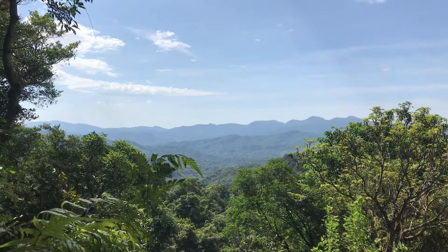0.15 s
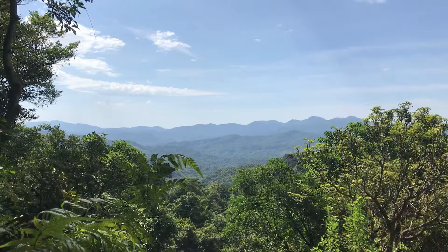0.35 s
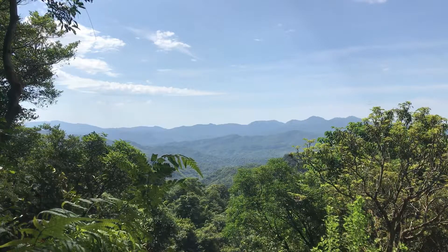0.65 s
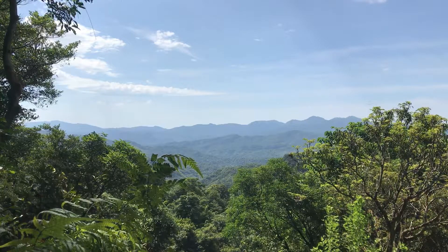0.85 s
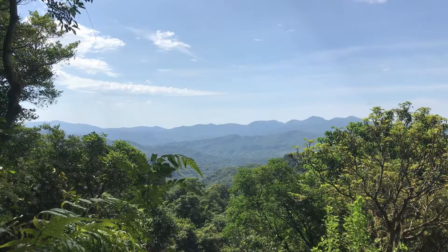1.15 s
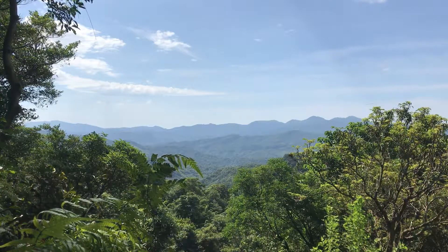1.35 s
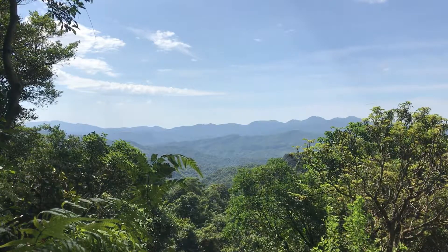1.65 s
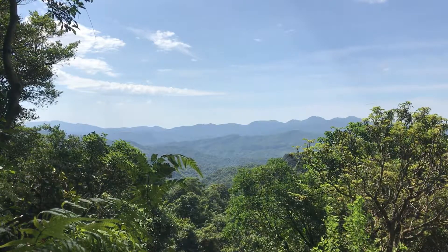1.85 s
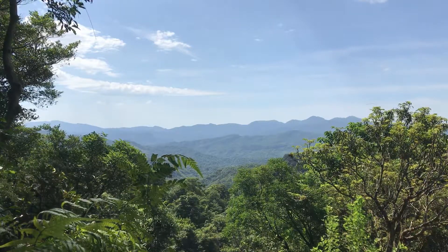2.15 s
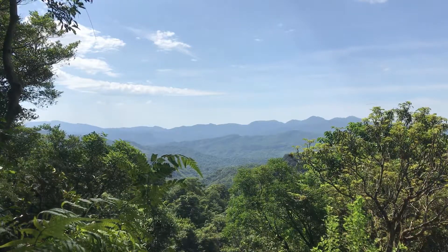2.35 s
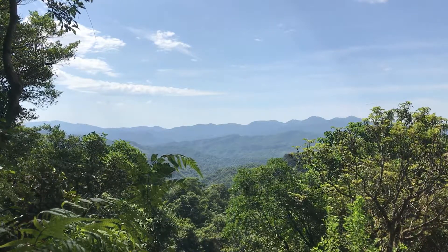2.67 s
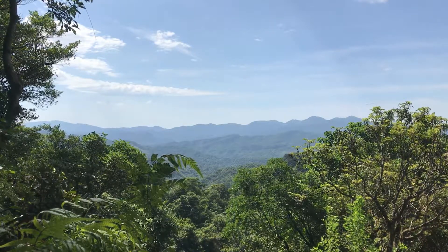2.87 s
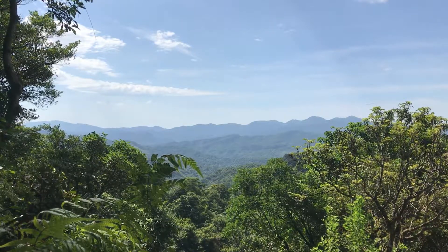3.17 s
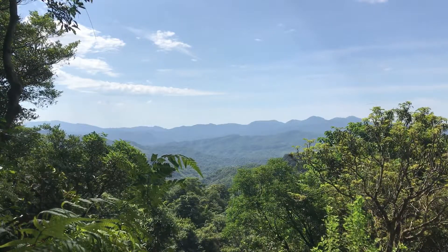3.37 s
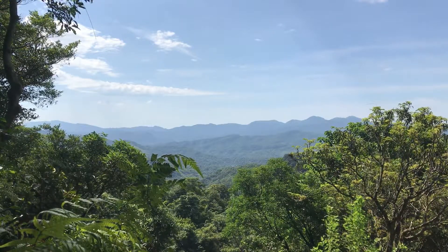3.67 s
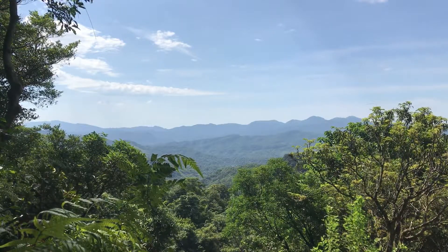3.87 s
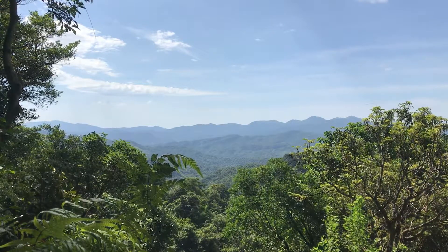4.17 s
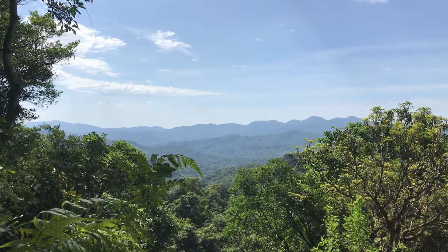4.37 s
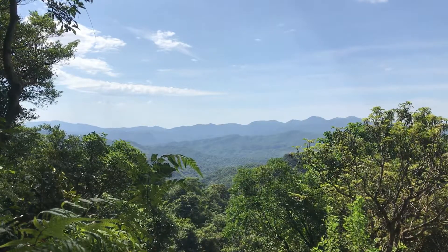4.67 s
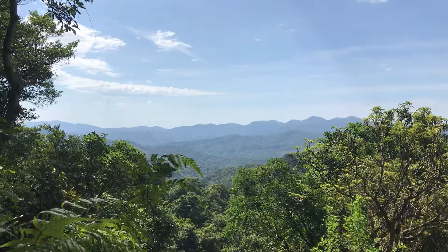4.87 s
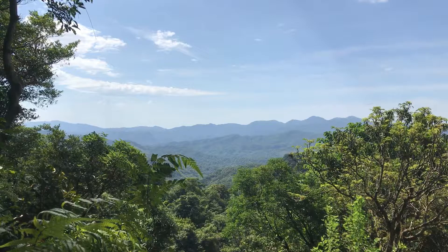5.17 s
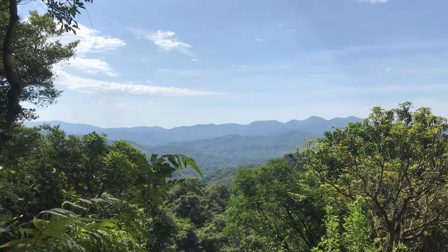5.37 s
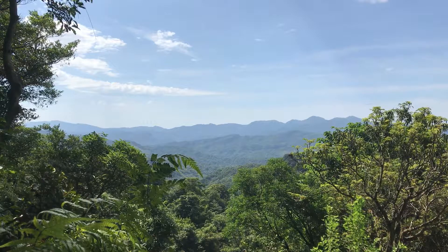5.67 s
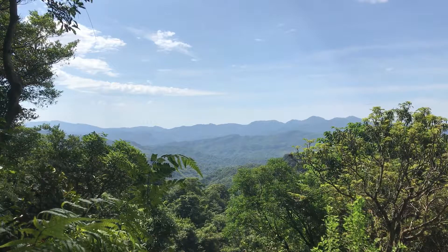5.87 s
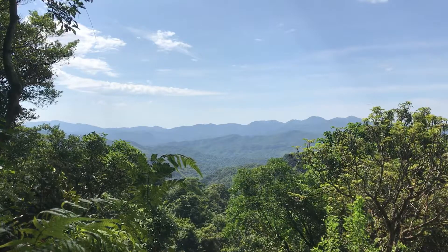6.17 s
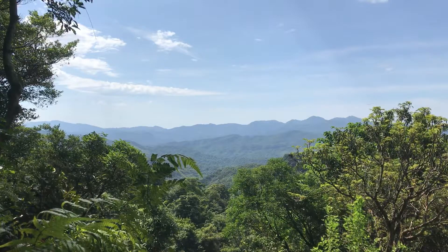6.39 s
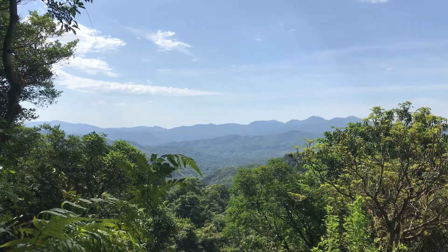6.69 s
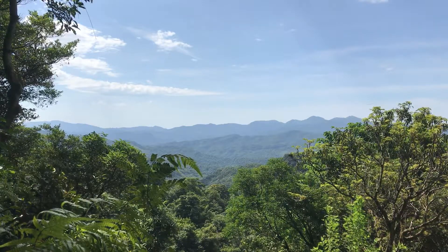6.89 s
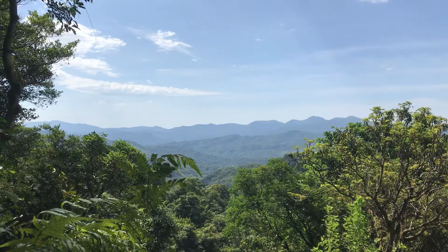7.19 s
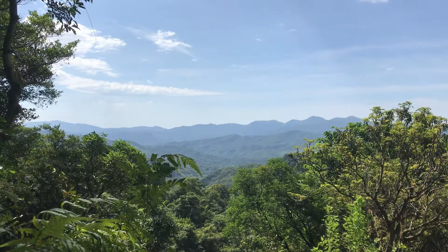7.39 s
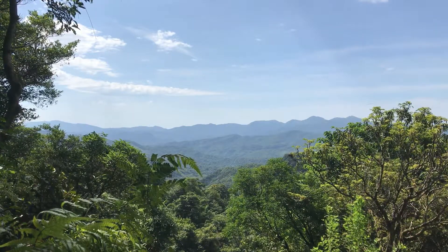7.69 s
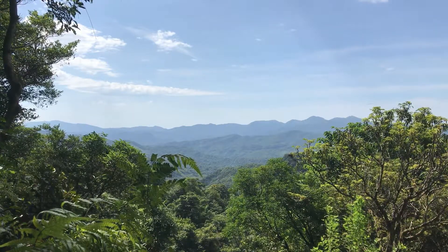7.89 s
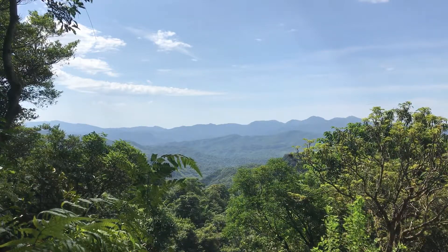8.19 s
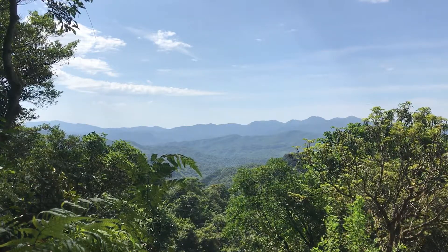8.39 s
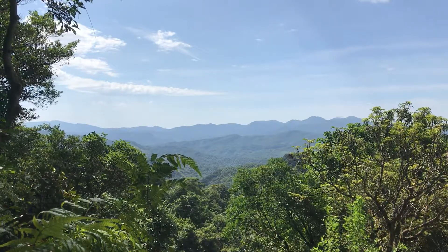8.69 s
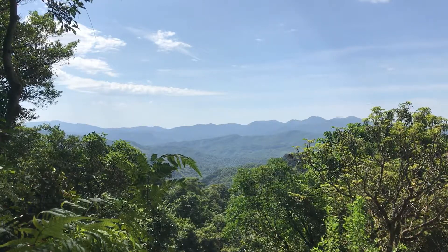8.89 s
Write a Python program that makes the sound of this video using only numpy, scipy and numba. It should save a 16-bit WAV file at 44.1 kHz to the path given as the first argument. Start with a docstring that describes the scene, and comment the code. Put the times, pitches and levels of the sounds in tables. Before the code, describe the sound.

Soft owl-like hoots in slow phrases and quick runs, with occasional bird whistles and raspy chatters, amid dense high-pitched cicada buzzing outdoors.

```python
"""A forested hilltop over a valley: quiet air, a far insect chorus, a cicada that drones and one that sizzles.
Close by, a cicada buzzes, stops within a second, stutters, then resumes a long falling buzz near the end.
Its clicks ring its abdomen. From half a second on, an owl-like bird pipes short falling hoots, slow phrases
alternating with quick runs; far birds answer. Another bird whistles, and twice chatters into a rasp.
The insects are clicks and noise through resonances, the birds gliding sines; echoes are decaying noise."""
import sys
import numpy as np
from scipy import signal
from scipy.fft import rfft, irfft
from scipy.io import wavfile
from scipy.ndimage import uniform_filter1d
from numba import njit

SR = 44100
rng = np.random.default_rng(int(sys.argv[2]) if len(sys.argv) > 2 else 0)


def generate_wav(sig):
    """Save sig (samples, or channels by samples) to the path in sys.argv[1] as 16-bit PCM at SR."""
    pcm = np.round(np.clip(np.atleast_2d(sig).T, -1, 1) * 32767).astype(np.int16)
    wavfile.write(sys.argv[1], SR, pcm)


N = 398663
T = np.arange(N) / SR  # s
BUZZ_RESUMES_S = 7.686  # the near cicada's closing buzz


def undb(db):
    """Decibels to gain."""
    return 10 ** (np.asarray(db) / 20)


def unit(x):
    """Scale to rms 1."""
    return x / np.sqrt(np.mean(x ** 2))


def curves(rows):
    """Each column of a table, joined by straight lines in time."""
    s, *columns = np.transpose(rows)
    return [np.interp(T, s, c) for c in columns]


def walk(rate, size=N):
    """Smooth chance with a spread near 1, drawn anew `rate` times per second."""
    k = max(int(SR / rate), 1)
    steps = np.repeat(rng.standard_normal(size // k + 1), k)
    return 1.3 * uniform_filter1d(steps, k)[:size]


def noise(colour):
    """Noise with a spectrum of (Hz, dB) points, falling steeply below the first."""
    hz, db = np.transpose(colour)
    f = np.arange(N // 2 + 1) * SR / N + 1
    gain = undb(np.interp(np.log(f), np.log(hz), db)) * np.minimum(f / hz[0], 1) ** 4
    return unit(irfft(rfft(rng.standard_normal(N)) * gain, N))


@njit
def svf(x, hz, width):
    """State-variable band-pass with a moving centre."""
    y, b, l = np.empty(len(x)), 0., 0.
    for i in range(len(x)):
        g, k = np.tan(np.pi * hz[i] / SR), width / hz[i]
        v = (b + g * (x[i] - l)) / (1 + g * (g + k))
        b, l, y[i] = 2 * v - b, l + 2 * g * v, k * v
    return y


def ring(x, hz, width):
    """A resonance (centre and width in Hz) applied twice, for steep skirts."""
    centre = np.minimum(hz + np.zeros(N), .45 * SR)
    once = svf(x, centre, float(width))
    return svf(once, centre, float(width))


def forest(x, wet_db, t60, patchy_db):
    """Direct sound plus scatter from trunks and leaves, dying by 60 dB in t60 s, in clumps where patchy."""
    t = T[:SR * 2]
    decay = np.exp(-np.log(1000) * t / t60)
    tail = rng.standard_normal(len(t)) * decay * undb(patchy_db * walk(70, size=len(t)))
    scatter = signal.fftconvolve(x, tail / np.linalg.norm(tail))[:N]
    return x + undb(wet_db) * scatter


def add(out, start, x):
    """Mix a short sound in at a time in seconds."""
    i = int(start * SR)
    lo, hi = max(i, 0), min(i + len(x), N)
    if hi > lo:
        out[lo:hi] += x[lo - i:hi - i]


def valley_air():
    """Distant air and valley rumble, steady noise whose level wanders slightly."""
    # Each row: frequency in Hz, relative level in dB.
    air_colour = [(22, -28), (45, -3), (63, 2), (110, -4.5), (250, -11), (600, -17.5), (3500, -20.5)]
    return noise(air_colour) * undb(-58.5 + .5 * walk(7.5))


def chorus():
    """Many far insects blur into a band; a few hold their own pitch; all sink towards the end."""
    # The blur. Each row: frequency in Hz, relative level in dB.
    blur_colour = [(3300, -55.5), (4200, -32), (5200, -30.5), (6000, -9.5), (6800, -1), (7500, 0.5),
                   (8500, -0.5), (9300, -8), (10400, -14), (15500, -29)]
    # Pitches that stand out. Each row: pitch in Hz, width in Hz, relative level in dB.
    voices = [(4630, 310, -20.5), (5190, 250, -16.5), (6626, 69, 5), (6786, 31, 3), (7136, 180, 7.5),
              (7360, 113, 5), (8330, 54, 4.5)]
    lines = 0
    for hz, width, db in voices:
        voice = unit(ring(rng.standard_normal(N), hz, width))
        lines = lines + undb(db + 2 * walk(1.156)) * voice
    fade_db = np.interp(T, [0, 7, 9], [0, -1, -4])
    band = undb(-30.5) * noise(blur_colour) + undb(-32.0) * unit(lines)
    return band * undb(fade_db + .5 * walk(13))


def hoot(hz, fall):
    """A brief, nearly pure falling note, peaking mid-way through 0.1 s, where it slides fastest (Hz per s)."""
    t = T[:SR // 10] - 1 / 20
    swell = np.exp(-(t / np.where(t < 0, .008, .014)) ** 2)
    slide = fall * .019 * np.tanh(t / .019)
    return swell * np.sqrt(2) * np.sin(2 * np.pi * np.cumsum(hz - slide) / SR)


def far_birds():
    """Other hooting birds answer from across the valley, half lost in their echoes."""
    # Peaks of the clearest hoots, in seconds.
    clear_hoots = [0.472, 0.786, 0.883, 1.161, 2.232, 4.553, 4.645, 5.469, 5.604, 6.321, 6.799, 7.748,
                   8.556]
    far_hz, far_db = 1170, -58.5
    faint_per_s, faint_hz, faint_db = 7, 1100, -65  # averages of the faint hoots scattered between
    far = np.zeros(N)
    for s in clear_hoots:
        add(far, s - 1 / 20, undb(far_db) * hoot(far_hz, fall=10000))
    for k, (late, pitch, loud) in enumerate(rng.standard_normal((100, 3))):
        start = (k + late / 2) / faint_per_s - 1 / 10
        faint = undb(faint_db + 2 * loud) * hoot(faint_hz * (1 + .05 * pitch), fall=10000)
        add(far, start, faint)
    return forest(far, wet_db=-3, t60=1.1, patchy_db=5)


def sizzling_cicada():
    """A very high hiss that slowly grows, easing off about every 1.2 s, most deeply towards the end."""
    # Each row: frequency in Hz, relative level in dB.
    hiss_colour = [(9500, -27), (10400, -11), (11000, 8.5), (11550, 5.5), (12800, 7.5), (14000, 2.5),
                   (15700, -2)]
    # Each row: middle of the pause in seconds, length in seconds, depth in dB.
    pauses = [(0, 0.64, 4.5), (1.372, .16, 5), (2.3, 0.33, 2), (3.502, 0.65, 2), (4.74, 0.42, 4),
              (5.906, 0.39, 6), (7.13, .48, 8.5), (8.366, 0.43, 10)]
    start_db, growth_db_per_s = -37, 0.4339
    eased_db = sum(depth * np.exp(-(2 * (T - s) / length) ** 4) for s, length, depth in pauses)
    tone = unit(ring(rng.standard_normal(N), 11555, width=110))
    hiss = noise(hiss_colour) + undb(-14) * tone
    return hiss * undb(start_db + growth_db_per_s * T - eased_db + .5 * walk(20))


def tymbal(rate, rasp, jitter, uneven, count=6):
    """Ribs buckle in turn, over and over; each has its own timing and strength and trails a crackle."""
    turns = np.cumsum(rate) / SR
    rib = turns.astype(int) % count
    early, strong = (unit(r - r.mean())[rib] for r in rng.standard_normal((2, count)))
    phase = (turns + jitter * walk(700) + uneven * early) % 1
    lag = (phase - .5) * SR / rate  # samples from the click
    clicks = np.sinc(lag) * np.exp(-(lag / 6) ** 2) * undb(walk(500) + strong)
    crackle = rng.standard_normal(N) * np.exp(-((phase - .5) % 1) / .3)
    sound = unit(clicks) + rasp * unit(crackle)
    # so small a body radiates little below its resonance
    return signal.sosfilt(signal.butter(8, 4850, "high", fs=SR, output="sos"), sound)


def droning_cicada():
    """An unbroken buzz that slows, quickens and slows again while its resonance falls."""
    # Each row: time in seconds, clicks per second, abdomen resonance in Hz, level in dB.
    drone = [(0, 510, 8200, -27.5), (2, 410, 8000, -27), (4, 520, 7740, -29.5), (6, 550, 7290, -31),
             (7.5, 522, 7120, -31), (9.04, 475, 6187, -32)]
    rate, hz, db = curves(drone)
    clicks = tymbal(rate, rasp=.45, jitter=.02, uneven=.025)
    body = ring(clicks, hz, width=1520)
    scattered = forest(body, wet_db=-6, t60=.2, patchy_db=0)
    return unit(scattered) * undb(db + .5 * walk(18))


def chirp(length, first_hz, last_hz, db, rasp, undertone=0):
    """A slurred note whose pitch is shaken by a rough syrinx; the undertone lies an octave below."""
    n = int(length * SR)
    shake = 1 + .115 * np.clip(rasp, 0, 1) * walk(1000, size=n)
    hz = np.linspace(first_hz, last_hz, n) * shake
    phase = 2 * np.pi * np.cumsum(hz) / SR
    tone = unit(np.sin(phase) + undertone * np.sin(phase / 2))
    return tone * signal.windows.tukey(n, .6) * undb(db - 1.8)


def chattering_bird():
    """Five harsh upslurs slow and swell into a long rasp; clear whistles crown it or sound alone."""
    # Starts of the chatters, in seconds.
    chatter_starts = [2.23, 5.942]
    # Single whistles, squeaks and rasps. Each row: start in seconds, length in seconds, first pitch in Hz,
    # last pitch in Hz, relative level in dB, rasp from 0 to 1.
    whistles = [(-.02, .065, 2606, 2670, -48.5, 0.26), (-.02, 0.077, 2120, 2055, -56.5, .7),
                (2.637, 0.024, 1725, 1500, -50, 0.06), (2.65, 0.118, 2300, 2414, -46, 0.23),
                (3.52, .13, 2104, 2030, -65, 0.62), (3.72, 0.073, 2460, 2420, -66, 0.18),
                (4.077, 0.019, 2100, 2500, -56, .6), (4.106, 0.16, 2260, 2274, -55, 0.21),
                (4.119, 0.053, 2835, 2920, -51.5, 0.82), (4.171, 0.126, 2490, 2667, -50, 0.12),
                (4.281, 0.029, 2740, 2900, -42.5, 0.02), (4.308, 0.0256, 2620, 2180, -46, 0.34),
                (6.516, 0.022, 1750, 1570, -46.5, 0.3), (6.583, 0.084, 2535, 2520, -44, .1),
                (6.626, 0.047, 1950, 2600, -47.5, 1), (8.768, 0.09, 1606, 1610, -61, 0.2),
                (8.868, 0.038, 2740, 2780, -60.5, 0.2), (8.983, .081, 1960, 2030, -61, 0.1)]
    first_gap_s, slowing, note_s = .072, 1.15, 0.0784  # each gap is longer by the slowing factor
    from_hz, to_hz, first_db, step_db = 1730, 2060, -52, 1
    rasp_after_s, rasp_s, rasp_hz, rasp_db = .42, .18, 1990, -46.5
    harsh, clear = np.zeros(N), np.zeros(N)
    for start in chatter_starts:
        s = start
        for k in range(5):
            add(harsh, s, chirp(note_s, from_hz, to_hz, first_db + k * step_db, rasp=.68))
            s += first_gap_s * slowing ** k
        add(harsh, start + rasp_after_s, chirp(rasp_s, rasp_hz, rasp_hz, rasp_db, rasp=1.0))
    for s, *note in whistles:
        add(clear, s, chirp(*note, undertone=undb(-17.5)))
    # the bird's own tree scatters it quickly, the wider forest faintly and for longer
    own_tree = forest(harsh + clear, wet_db=-3, t60=.33, patchy_db=1)
    return forest(own_tree, wet_db=-12, t60=1.2, patchy_db=1)


def hooting_bird():
    """Slow phrases of evenly spaced hoots, each with a soft first note, alternate with quick runs."""
    # Slow phrases. Each row: first peak in seconds, number of notes, relative level in dB.
    phrases = [(0.549, 2, -40), (2.295, 3, -40), (4.092, 4, -39.5), (5.931, 3, -40), (7.829, 3, -40)]
    # The quick run. Each row: peak in seconds into the run, relative level in dB, pitch in Hz,
    # fall in Hz per second.
    run = [(0, -38, 1060, 16100), (.066, -35.5, 1050, 14850), (.129, -37, 1030, 12040),
           (.19, -38.5, 1010, 8460), (.257, -43, 1000, 6040), (.361, -45.5, 995, 5000)]
    # Starts of the runs, in seconds.
    run_starts = [1.319, 3.171, 5.024, 6.874, 8.75]
    gap_s, slow_hz, slow_fall, first_note_db = .1025, 993, 11500, -3  # fall in Hz per s
    notes = []
    for start, count, db in phrases:
        for k in range(round(count)):
            notes.append((start + k * gap_s, db + first_note_db * (k == 0), slow_hz, slow_fall))
    for start in run_starts:
        notes += [(start + s, db, hz, fall) for s, db, hz, fall in run]
    near = np.zeros(N)
    # pitch and slide vary a little from note to note
    for (s, db, hz, fall), (pitch, slide) in zip(notes, rng.standard_normal((len(notes), 2))):
        note = undb(db - 3.3) * hoot(hz * (1 + .01 * pitch), fall * (1 + .1 * slide))
        add(near, s - 1 / 20, note)
        # the slope below throws each note back a moment later
        add(near, s - 1 / 20 + .011, undb(-10) * note)
    return forest(near, wet_db=-10.0, t60=2.0, patchy_db=2)


def syllable_gate():
    """Open while the near cicada sings: the opening buzz, each syllable of each bout, the closing buzz."""
    # Bouts, from long syllables through a flutter and pairs to steady ticks. Each row: start in seconds,
    # number of syllables, period in seconds, syllable length in seconds.
    bouts = [(0.907, 3, 0.083, 0.063), (1.157, 2, .09, .075), (1.33, 1, 0, .052), (1.42, 2, .068, 0.063),
             (1.617, 2, .139, 0.07), (1.905, 2, .086, 0.058), (2.078, 7, .054, 0.028),
             (2.483, 2, .077, .028), (2.674, 2, .049, .031), (2.845, 2, .058, 0.033),
             (3.06, 4, .163, 0.036), (3.732, 8, .1775, 0.038), (5.157, 5, .204, .036),
             (6.169, 8, .1862, 0.04), (7.602, 1, 0, 0.03)]
    buzz_stops_s = .848
    spans = [(0, buzz_stops_s), (BUZZ_RESUMES_S, T[-1])]
    for start, count, period, length in bouts:
        spans += [(start + k * period, length) for k in range(round(count))]
    gate = np.zeros(N)
    for s, length in spans:
        corners = [s - .006, s + .006, s + length - .008, s + length + .01]
        gate += np.interp(T, corners, [0, 1, 1, 0])
    return gate


def stuttering_cicada():
    """Clicks ring the abdomen, whose pitch sinks as it stretches; the closing buzz is more regular."""
    # Each row: time in seconds, mean clicks per second, abdomen resonance in Hz, relative level in dB.
    song = [(0, 480, 6630, -29.5), (1.2, 475, 6350, -30.5), (2.8, 480, 6320, -30), (3.6, 464, 6140, -31),
            (7.0, 556, 6060, -32), (7.9, 586, 6010, -33), (8.3, 616, 5580, -33), (8.7, 650, 5450, -32),
            (9.04, 662, 5310, -31)]
    pull_slowing = .11  # share of the click rate lost over each muscle pull of the closing buzz
    rate, hz, db = curves(song)
    closing = T > BUZZ_RESUMES_S
    pull = np.cumsum(rate) / SR / 10 % 1  # a pull lasts about ten clicks
    rate = rate * (1 + closing * pull_slowing * (.5 - pull))
    jitter = np.where(closing, .008, .024)
    uneven = np.where(closing, .004, .035)
    clicks = tymbal(rate, rasp=.2, jitter=jitter, uneven=uneven)
    # the membrane rings first, then the air sac behind it, so the skirts are steep
    membrane = ring(clicks, hz, width=1780)
    body = ring(membrane, hz, width=1860)
    sung = unit(body) * syllable_gate() * undb(db + .8 * walk(25))
    return forest(sung, wet_db=-14, t60=.15, patchy_db=0)


def scene():
    """All the voices over the quiet air of the valley, at one microphone."""
    background = valley_air() + chorus() + far_birds()
    cicadas = sizzling_cicada() + droning_cicada() + stuttering_cicada()
    birds = chattering_bird() + hooting_bird()
    return (background + cicadas + birds)[None]


def record(dry):
    """The recorder cuts the top, steeply above 15.7 kHz."""
    return signal.sosfilt(signal.ellip(10, .2, 80, 15700, fs=SR, output="sos"), dry)


dry = scene()
out = record(dry)
generate_wav(out)
```